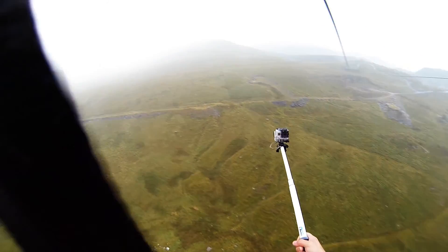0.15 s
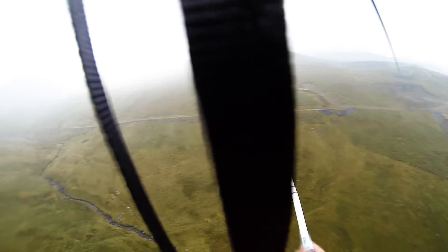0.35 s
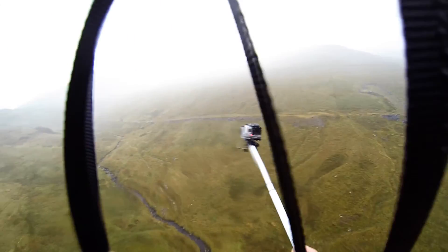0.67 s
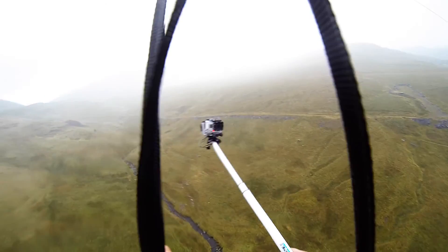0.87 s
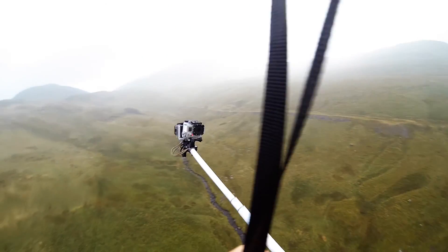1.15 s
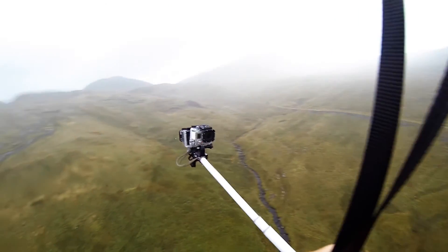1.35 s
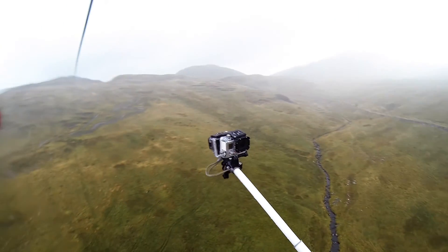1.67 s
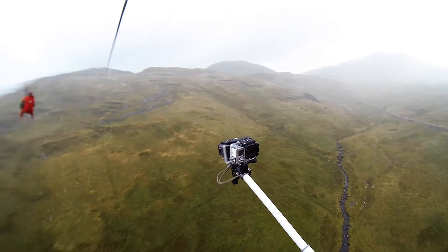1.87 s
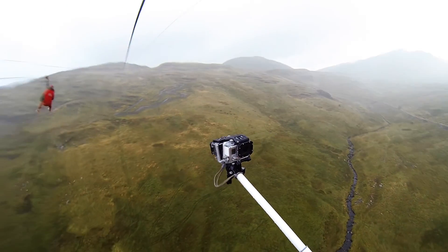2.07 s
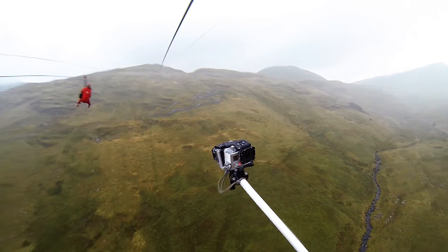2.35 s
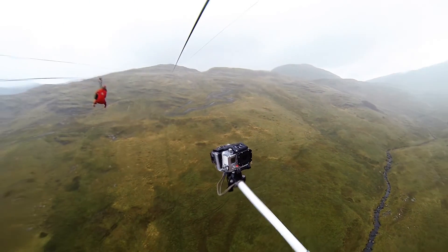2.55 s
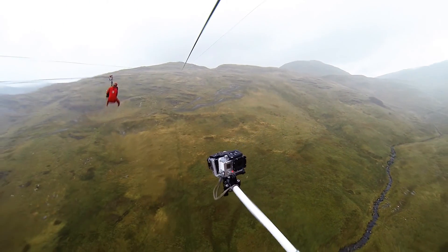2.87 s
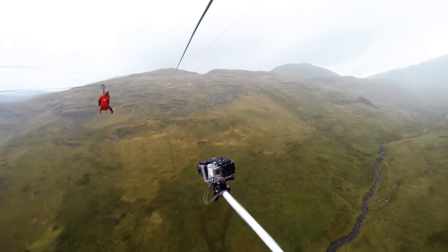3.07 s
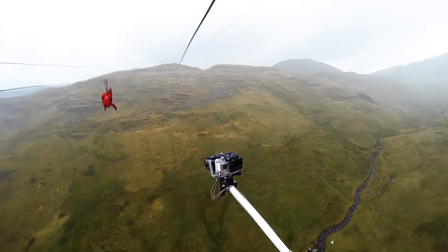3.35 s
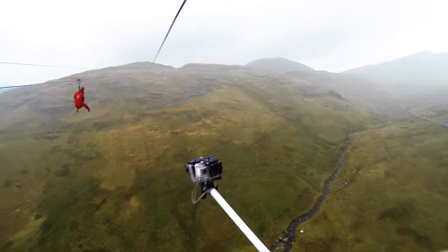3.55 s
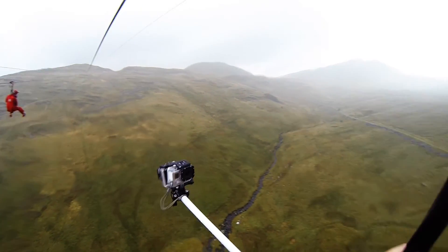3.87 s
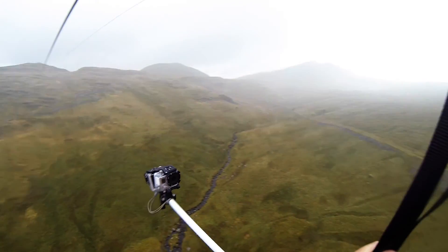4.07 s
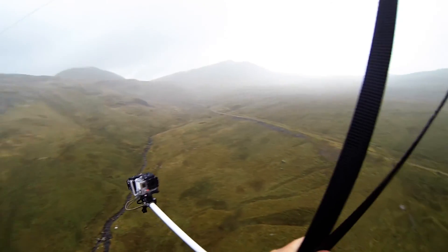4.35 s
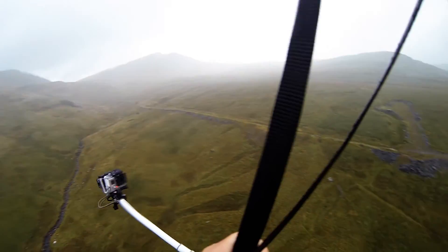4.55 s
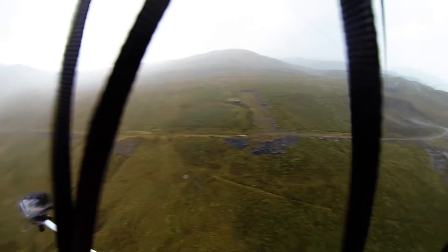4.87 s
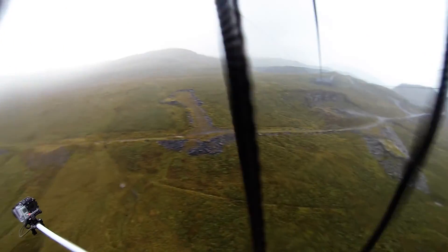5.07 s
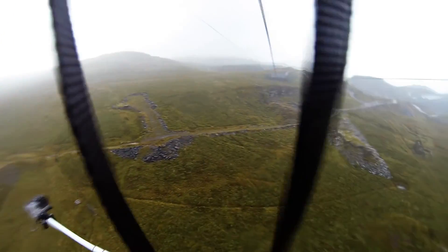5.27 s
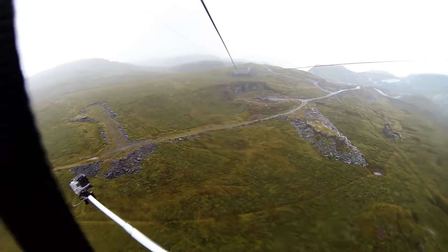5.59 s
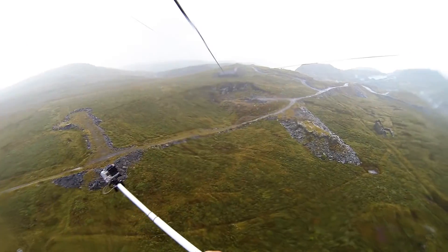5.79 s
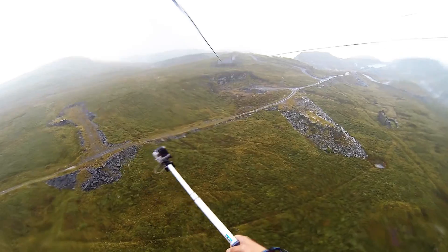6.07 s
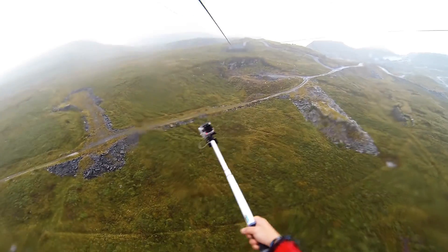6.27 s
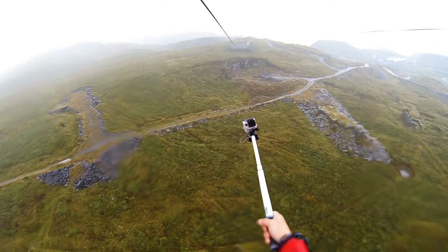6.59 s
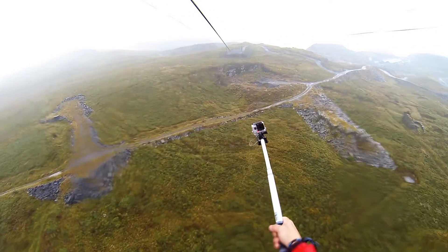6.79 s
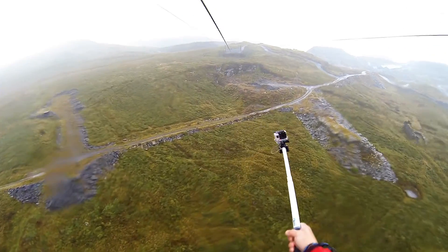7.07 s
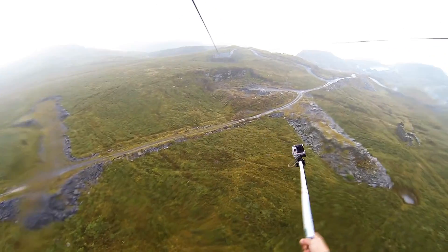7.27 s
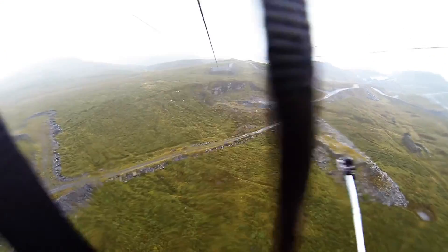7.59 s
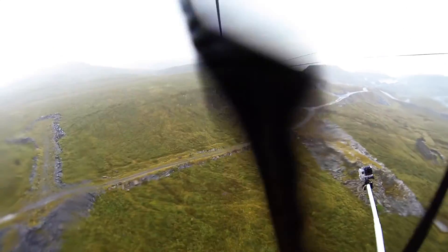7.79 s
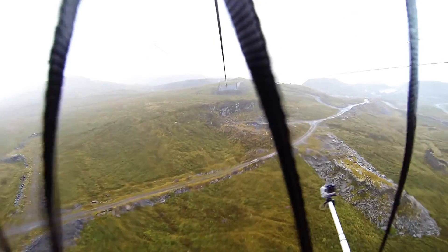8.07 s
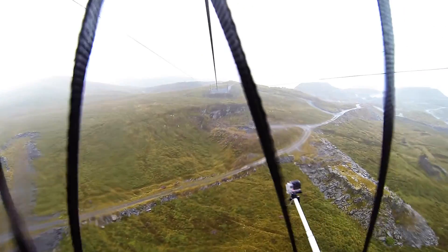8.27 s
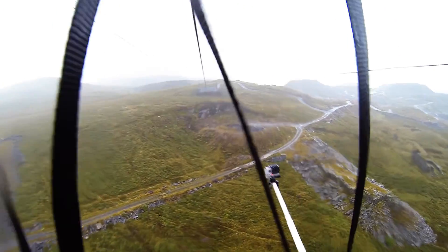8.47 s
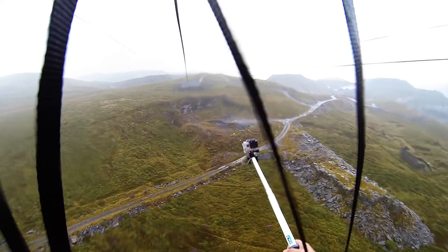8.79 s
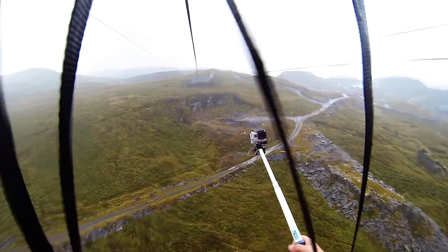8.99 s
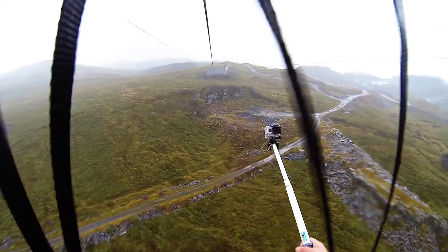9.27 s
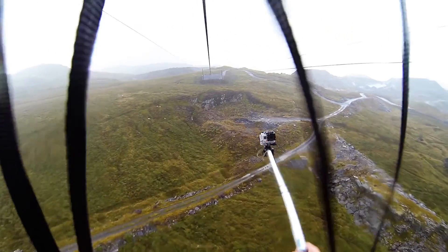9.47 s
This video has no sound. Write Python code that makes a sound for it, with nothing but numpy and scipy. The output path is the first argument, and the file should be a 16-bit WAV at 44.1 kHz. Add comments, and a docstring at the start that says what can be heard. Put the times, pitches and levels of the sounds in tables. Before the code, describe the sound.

A steady, gritty trolley whine and airy hiss on open moorland, with raindrops rapping hard plastic, one sharp knock early and a scraping slap near eight seconds.

```python
"""On misty open moorland a rider hangs from a zip-line trolley, a camera in a sealed case beside its microphone.
From the start pulleys whirr and air sings, in noise and rough tones that change as the rider slowly turns.
Drizzle raps on the case, a hard drop at 0.64 s, thickest from 2 to 4 s, facing forward; mist prickles throughout.
Wind rumbles; taut straps hum at 1.2, 4.7 and 8.3 s, and at 7.8 s one scrapes and slaps the case.
Any peak above the ceiling quickly turns the camera's gain down; the whirr ducks and then swells back."""
import sys
import numpy as np
from scipy import signal
from scipy.fft import irfft, next_fast_len
from scipy.io import wavfile
from scipy.ndimage import uniform_filter1d

SR = 44100
rng = np.random.default_rng(int(sys.argv[2]) if len(sys.argv) > 2 else 0)


def inscribe(sig):
    """Save sig as 16-bit PCM at rate SR to the path in sys.argv[1].

    A 1-D sig is mono; a 2-D sig holds one channel per row.
    Samples are clipped to [-1, 1] before scaling.
    """
    pcm = np.round(np.clip(np.atleast_2d(sig).T, -1, 1) * 32767)
    wavfile.write(sys.argv[1], SR, pcm.astype(np.int16))


N = 425124
TIME = np.arange(N) / SR

# Table levels are relative: the sources trim them, and the microphone and camera shape the sum.
# The ride as heard in the case: t/s, whirr level/dB, hiss level/dB, wind rumble level/dB
RIDE_LEVELS = [(0, -21.5, -29, -34.5), (.3, -19.5, -29, -34), (.57, -22.5, -26, -26), (.8, -23, -27.5, -34),
               (1.3, -20.5, -26.5, -29.5), (2.1, -25, -26.5, -30.5), (2.7, -26, -28, -36),
               (4.3, -26.5, -29.5, -35), (4.9, -25, -30, -32), (5.3, -20, -30.5, -26.5),
               (5.53, -20.5, -27.5, -30), (5.8, -22, -29, -35.5), (6.2, -20, -27.5, -33),
               (7.2, -21.5, -28.5, -37.5), (7.7, -23.5, -32.5, -28), (8.2, -24, -30.5, -34.5),
               (8.9, -23.5, -30, -35), (9.64, -24, -32, -35)]
# The rider's turning: t/s, heading/degrees (0 looks back up the cable, 180 forward)
RIDER_HEADING = [(0, 26), (.56, 30), (.66, 88), (1.25, 105), (1.6, 140), (2.3, 175), (3.6, 175), (4.2, 138),
                 (4.72, 114), (4.88, 66), (5.15, 54), (5.5, 32), (5.95, 5), (7.1, 0), (7.7, 20), (7.92, 52),
                 (9.64, 54)]
# Tones of pulleys, cable and rigging: f/Hz, width/Hz, level/dB, loudest heading/degrees, reach/degrees
RIGGING_TONES = [(1370, 130, 3, 30, 11), (1410, 200, 0, 45, 90), (1610, 290, -2, 44, 45),
                 (1910, 190, 0, 7, 46), (2090, 130, 4, 0, 15), (2340, 160, 1, 97, 19),
                 (2490, 140, -3, 58, 18), (2885, 160, 2, 68, 40), (3015, 140, 4, 0, 32),
                 (2980, 190, 0, 150, 70), (3440, 170, -6, 0, 23), (3400, 170, -6, 161, 67),
                 (3800, 400, -9, 149, 58), (4250, 170, 0, 70, 70), (4600, 300, 0, 6, 28),
                 (4400, 250, -7, 174, 43), (4930, 220, -4, 122, 44), (5190, 320, -2, 138, 71),
                 (5630, 200, -3, 56, 11), (5650, 900, -13, 0, 30), (6030, 240, -9, 38, 33),
                 (6050, 650, -9, 145, 36), (6700, 550, -12, 35, 38), (7500, 320, -12, 92, 56),
                 (9600, 520, -23, 88, 35), (12100, 220, -31, 0, 14)]
# Spectrum of the broad rolling noise: f/Hz, level/dB
ROLLING_SPECTRUM = [(250, -20.5), (550, -26), (1000, -21.5), (1150, -14), (1330, -4), (1850, -6.5),
                    (2200, -7.5), (2750, -8), (3600, -13.5), (3800, -21)]
# Spectrum of the air rush through the case: f/Hz, level/dB
AIR_SPECTRUM = [(3900, -12.5), (4500, -11), (5300, -11), (5550, -19.5), (7300, -20), (8100, -29),
                (9500, -34), (10700, -34.5), (15000, -46)]
# Faint rings of the mount: f/Hz, width/Hz, level/dB relative to the whirr
MOUNT_RINGS = [(675, 55, -32.5), (877, 37, -29.5)]
# Big drops on the case: t/s, wall ring f/Hz, ring level/dB, tick f/Hz, tick level/dB
BIG_DROPS = [(0.141, 1770, -19.5, 3330, -21), (0.379, 1450, -21, 6200, -24),
             (0.436, 1920, -21.5, 3580, -19), (0.473, 1790, -25, 2940, -15),
             (0.505, 1690, -20.5, 3250, -21), (0.574, 2300, -18, 5400, -14),
             (0.603, 2260, -21, 4200, -10.5), (0.643, 1370, -2.5, 3120, -13), (0.806, 1460, -13, 3410, -16),
             (1.332, 1740, -14.5, 3150, -13.0), (1.36, 1450, -11.5, 6530, -16),
             (1.494, 1520, -18.5, 6140, -21), (1.577, 1670, -15.5, 4260, -11.0),
             (1.843, 1480, -11.5, 3890, -25), (1.977, 1370, -16.5, 4520, -16),
             (2.017, 1570, -17.5, 3180, -21), (2.077, 1470, -15, 3260, -17),
             (2.157, 1680, -18, 4310, -30.5), (2.174, 1390, -18.0, 5200, -18.5),
             (2.253, 1810, -24, 6050, -13.5), (2.296, 1800, -19.5, 4540, -13),
             (2.354, 1460, -13, 4430, -13), (2.443, 1460, -10, 3280, -17), (2.55, 1370, -32, 5060, -12.5),
             (2.583, 1640, -16, 4400, -10), (2.78, 1630, -22, 4470, -21), (2.832, 1830, -26, 5490, -16),
             (2.85, 1490, -18, 4700, -16.5), (2.884, 1590, -19, 5170, -13.5),
             (2.982, 2200, -36, 4680, -10.5), (3.025, 1590, -18.5, 4200, -17),
             (3.154, 1540, -12.5, 4360, -10.5), (3.245, 1470, -12, 4950, -8.5),
             (3.283, 1460, -22, 5020, -16.5), (3.393, 1260, -15.5, 4910, -10.5),
             (3.479, 1450, -23, 4450, -16.5), (3.535, 1700, -26, 4540, -15),
             (3.558, 1450, -18, 4510, -15.5), (3.603, 1430, -5, 4120, -13), (3.617, 1900, -29, 4400, -11),
             (3.791, 1620, -15.5, 4550, -12), (3.816, 1350, -18, 4700, -12), (3.86, 1480, -19, 4600, -13.5),
             (3.952, 1440, -10, 4700, -9), (4.224, 1520, -9, 4160, -12), (4.642, 1540, -11.5, 4254, -10.5),
             (4.807, 2110, -27, 3080, -19), (5.224, 1500, -21, 4950, -16.0), (5.457, 1620, -14, 3400, -28),
             (5.573, 1480, -12.0, 4280, -21.5), (6.251, 1480, -13.0, 3490, -17),
             (6.335, 1790, -27, 3310, -18), (6.361, 1540, -19, 3080, -15),
             (6.384, 1990, -19.5, 3920, -15.5), (7.103, 2010, -22, 3050, -16.5),
             (7.143, 1530, -20, 5000, -18.5), (7.172, 2140, -12.5, 2930, -34.0),
             (7.374, 1890, -23.5, 2870, -14), (7.418, 1380, -19.5, 6750, -20.5),
             (8.367, 1690, -15, 3740, -29.0), (8.447, 1410, -16.5, 3230, -15),
             (8.84, 1610, -16.5, 3440, -22), (8.894, 1460, -15.5, 4300, -32),
             (9.036, 1520, -14.5, 6400, -15.5), (9.267, 1910, -14, 3020, -13.5),
             (9.386, 1400, -17.5, 6600, -21), (9.471, 1470, -18, 6600, -25.0),
             (9.599, 1830, -23, 3450, -21)]
# A strap brushing the case: t/s, scrape level/dB, wall squeak level/dB, buffeting level/dB
STRAP_BRUSH = [(7.752, -48, -48, -45), (7.762, -19, -23, -16.5), (7.777, -11.5, -8, -8.5),
               (7.80, -17.5, -29, -9), (7.82, -18, -30, -22), (7.83, -31, -32, -8.5),
               (7.878, -25, -25, -12), (7.895, -41, -40, -19), (7.925, -52, -52, -38)]
# Spectrum of webbing scraping over the case: f/Hz, level/dB
SCRAPE_SPECTRUM = [(200, -19), (285, 3), (400, -19), (700, -18), (1000, -13), (1330, -7.5), (1700, -13),
                   (2700, -7.5), (3500, -29), (8000, -28.5)]
# The strap slapping the case: t/s, wall ring level/dB, thump level/dB
STRAP_SLAPS = [(7.767, -13.5, -8.5), (7.834, -4.5, -2), (7.853, -22, -20), (7.865, -15, -16),
               (7.872, -27, -9)]
# Spectrum of turbulence on the case: f/Hz, level/dB
RUMBLE_SPECTRUM = [(15, -16), (30, 1.5), (55, 2), (110, 0.5), (170, -2), (230, -11), (330, -18), (500, -25),
                   (900, -45)]
# Taut straps humming in the wind: start t/s, end t/s, f/Hz, pitch wander width/Hz, level/dB
STRAP_HUMS = [(1.208, 2.4, 159.7, 43.5, -31), (4.74, 5.68, 99.5, 7.36, -25), (8.3, 9.9, 69.3, 8.4, -34)]

RING_T60_S, TICK_T60_S = 0.0095, 0.0034  # 60 dB decay of the wall ring and of the tick
# fine drizzle: mean drops a second at any heading, and extra when facing forward
LEE_PER_S, FACING_PER_S = 46, 100
FORWARD_DEG, FACING_REACH_DEG = 176, 27
# smallest drop, range up to the largest, extra range facing forward; before hardness and drop() trims
FINE_DB, FINE_RANGE_DB, FACING_DB = -34, 12.5, 6.5
MIST_PER_S, MIST_DB = 94, -19  # mean specks a second; trim on their size
# gain control: peak ceiling, recovery, time constant of the duck
CEILING_DB, RECOVERY_DB_PER_S, DUCK_S = -2.5, 10, 0.00039
MIC_BEND, LOPSIDED = 0.072, 0.18  # how unevenly microphone, then recorder, treat the wave's two halves
SOFTEN_HZ, TOP_HZ = 13900, 15400  # gentle treble roll-off, then the steep cut


def trolley(whirr_db, hiss_db):
    """Rough tones over rolling noise; each tone comes forward as the rider turns towards its source."""
    heading, = curves(RIDER_HEADING)
    whirr, hiss = coloured(ROLLING_SPECTRUM), coloured(AIR_SPECTRUM)
    for hz, width, db, facing, reach in RIGGING_TONES:
        # reading at an uneven pace makes each tone waver a little in pitch
        travel = np.cumsum(1 + 0.006 * walk(5))
        voice = np.interp(travel, np.arange(N), tone(hz, width))
        towards = np.exp(-0.5 * ((heading - facing) / reach) ** 2)
        voice = voice * undb(db + 1.56 * walk(9)) * towards
        if hz < AIR_SPECTRUM[0][0]:
            whirr = whirr + voice
        else:
            hiss = hiss + voice
    # the mount rings in fits as the cable shakes it
    mount = np.zeros(N)
    for hz, width, db in MOUNT_RINGS:
        mount += undb(db + 0.94 * walk(10)) * unit(tone(hz, width))
    # uneven cable and turbulent air shake all the tones together
    judder = undb(0.7 * walk(22) + 1.0 * walk(160))
    whirr = (steady(whirr) + mount) * undb(whirr_db - 0.36)
    hiss = steady(hiss) * undb(hiss_db - 1.0)
    return judder * (whirr + hiss)


def drizzle():
    """Big drops and random fine ones; the harder a fine drop hits, the higher it ticks and the less it rings."""
    out = np.zeros(N)
    heading, = curves(RIDER_HEADING)
    facing = np.exp(-0.5 * ((heading - FORWARD_DEG) / FACING_REACH_DEG) ** 2)
    rate = LEE_PER_S + FACING_PER_S * facing

    # one noise cut into short splashes; each big drop has its own, fine drops take them in turn
    size = len(ring(1, 1))
    splashes = unit(coloured([(2000, 2), (5000, 2), (8000, -9.5), (11000, -18.5), (15500, -16)]))
    splashes = splashes[:N // size * size].reshape(-1, size)
    for k, (s, *colour) in enumerate(BIG_DROPS):
        add(out, s, drop(*colour, splashes[k]))

    # random waits are counted off against the drops expected so far
    chance = rng.random((1200, 4))
    turn = np.cumsum(-np.log(1 - chance[:, 0]))
    expected = np.cumsum(rate) / SR
    arrivals = np.interp(turn, expected, np.arange(N), right=-1).astype(int)
    for k, (i, (_, weight, place, hardness)) in enumerate(zip(arrivals, chance)):
        if i >= 0:  # -1 marks a drop after the end
            db = FINE_DB + (FINE_RANGE_DB + FACING_DB * facing[i]) * weight ** 2
            ring_hz = 1350 + 450 * place ** 2
            tick_hz = 3500 + 3300 * hardness ** 2
            splash = splashes[k % len(splashes)]
            add(out, i / SR, drop(ring_hz, db - 10 * hardness, tick_hz, db - 2.4 * hardness, splash))

    # the stiff case passes little below its first wall mode, and muffles the very top
    stiff = signal.butter(5, 1160, "high", fs=SR, output="sos")
    muffle = signal.butter(2, 11500, "low", fs=SR, output="sos")
    return signal.sosfilt(np.vstack([stiff, muffle]), out)


def drop(ring_hz, ring_db, tick_hz, tick_db, splash):
    """One drop: the case wall rings low, stiffer modes tick, and the splash fizzes for about a millisecond."""
    wall = ring(ring_hz, RING_T60_S) - 0.54 * ring(ring_hz * 1.26, RING_T60_S * 0.24)
    tick = ring(tick_hz, TICK_T60_S)
    tick = tick - 0.39 * ring(tick_hz * 0.848, TICK_T60_S)
    tick = tick - 0.5 * ring(tick_hz * 1.246, TICK_T60_S * 0.5)
    t = TIME[:len(splash)]
    flatten = 1 - np.exp(-t / 0.00016)  # the push builds up as the drop flattens
    fizz = splash * np.exp(-t / 0.00092)
    return flatten * (undb(ring_db + 16) * wall + undb(tick_db + 17.5) * (tick + undb(-8.5) * fizz))


def strap():
    """Webbing scrapes the case in jerks, makes its wall squeak, slaps it, and throws its wake on the microphone."""
    scrape_db, squeak_db, buffet_db = curves(STRAP_BRUSH)
    touching = (TIME > STRAP_BRUSH[0][0]) & (TIME < STRAP_BRUSH[-1][0])
    scrape = unit(coloured(SCRAPE_SPECTRUM)) * undb(scrape_db + 3.3 * walk(250))
    squeak = unit(tone(1386, 130)) * undb(squeak_db)
    wake = unit(coloured(RUMBLE_SPECTRUM)) * undb(buffet_db - 3.0)
    out = touching * (scrape + squeak + wake)
    for s, wall_db, thump_db in STRAP_SLAPS:
        wall = undb(wall_db + 5.5) * ring(1506, 0.026)
        thump = undb(thump_db + 5.0) * ring(140, 0.04)
        add(out, s, wall - thump)
    return out


def wind(rumble_db):
    """Turbulence rumbles on the case; straps shed vortices and hum when they cross the airflow."""
    out = unit(coloured(RUMBLE_SPECTRUM)) * undb(rumble_db + 0.25 + 1.9 * walk(18))
    for start, end, hz, width, db in STRAP_HUMS:
        swell = np.clip(np.minimum(TIME - start, end - TIME) / 0.12, 0, 1)
        phase = 2 * np.pi * np.cumsum(hz + width / 2 * walk(40)) / SR
        out = out + swell * undb(db + 1.7 * walk(32)) * np.sin(phase)
    return out


def mist(hiss_db):
    """Specks of mist prickle on the case, harder when the air rushes harder; each is a tiny high ping."""
    out = np.zeros(N)
    chance = rng.random((2400, 3))
    arrivals = np.cumsum(-np.log(1 - chance[:, 0])) / MIST_PER_S
    for s, (_, weight, place) in zip(arrivals, chance):
        if s < TIME[-1]:
            size_db = 20 + 16 * (weight ** 2 - 0.5)
            add(out, s, undb(size_db + MIST_DB) * ring(6400 + 3100 * place, 0.003))
    prickle = signal.butter(2, [5500, 11000], "band", fs=SR, output="sos")
    return signal.sosfilt(prickle, out) * undb(hiss_db)


def undb(db):
    """Decibels to gain."""
    return 10 ** (np.asarray(db) / 20)


def curves(table):
    """The columns of a table, joined by straight lines in time."""
    s, *columns = np.transpose(table)
    return [np.interp(TIME, s, c) for c in columns]


def noise(gain_at):
    """Random-phase noise whose spectrum follows the given gain at each frequency."""
    size = next_fast_len(N, real=True)
    f = np.arange(1, size // 2 + 2) * SR / size
    spectrum = gain_at(f) * np.exp(2j * np.pi * rng.random(len(f)))
    return irfft(spectrum, size)[:N] * np.sqrt(size)


def coloured(points):
    """Noise with a spectrum of (f/Hz, level/dB) points that falls steeply past both ends."""
    hz, db = np.transpose(points)

    def gain_at(f):
        ends = np.minimum(1, np.minimum(f / hz[0], hz[-1] / f)) ** 10
        return undb(np.interp(np.log(f), np.log(hz), db)) * ends

    return noise(gain_at)


def tone(hz, width):
    """A rough tone: noise in one steep resonance."""
    return noise(lambda f: 1 / np.sqrt(1 + (2 * (f - hz) / width) ** 4))


def walk(rate):
    """Random drift with rate new values a second, joined by straight lines; spread near 1."""
    knots = rng.standard_normal(4096)
    return 1.2 * np.interp(TIME * rate, np.arange(len(knots)), knots)


def steady(x):
    """Bring the level, taken over a quarter second, to 1."""
    return x / np.sqrt(uniform_filter1d(x ** 2, SR // 4))


def unit(x):
    """Scale to rms 1."""
    return x / x.std()


def add(out, s, x):
    """Mix a short sound in at s seconds."""
    i = int(np.clip(s * SR, 0, N - 1))
    out[i:i + len(x)] += x[:N - i]


def ring(hz, t60):
    """A struck mode: a sine dying by 60 dB in t60 seconds, its envelope starting at 1."""
    t = TIME[:SR // 25]
    return np.sin(2 * np.pi * hz * t) * np.exp(-np.log(1000) * t / t60)


def scene():
    """Everything reaches the camera's microphone directly; the open moor gives no echo."""
    whirr_db, hiss_db, rumble_db = curves(RIDE_LEVELS)
    ride = trolley(whirr_db, hiss_db)
    contacts = drizzle() + strap()
    background = wind(rumble_db) + mist(hiss_db)
    return (ride + contacts + background)[None]


def gain_control(x):
    """Any peak above the ceiling turns the gain down by as much, a moment late; it climbs back steadily."""
    over_db = np.maximum(20 * np.log10(np.abs(x) + 1e-9) - CEILING_DB, 0)
    recovered = RECOVERY_DB_PER_S * TIME
    # the deepest cut so far, less what has been recovered since
    cut_db = np.maximum.accumulate(over_db + recovered, axis=-1) - recovered
    lag = np.exp(-1 / (DUCK_S * SR))
    return x * undb(-signal.lfilter([1 - lag], [1, -lag], cut_db))


def record(dry):
    """Hard drops overload the microphone lopsidedly and thud; the camera rides gain, rounds peaks, cuts the top."""
    bent = dry - MIC_BEND * dry ** 2
    held = gain_control(bent)
    rounded = held / (1 + (held / 0.73) ** 6) ** (1 / 6)
    squeezed = rounded - LOPSIDED * np.abs(rounded) * rounded ** 2
    passband = signal.butter(2, [8, SOFTEN_HZ], "band", fs=SR, output="sos")
    cut = signal.ellip(8, 0.2, 70, TOP_HZ, fs=SR, output="sos")
    return signal.sosfilt(np.vstack([passband, cut]), squeezed)


dry = scene()
out = record(dry)
inscribe(out)
```